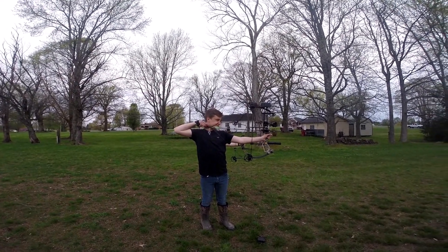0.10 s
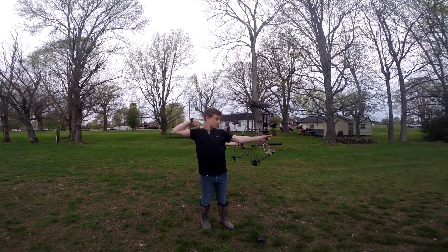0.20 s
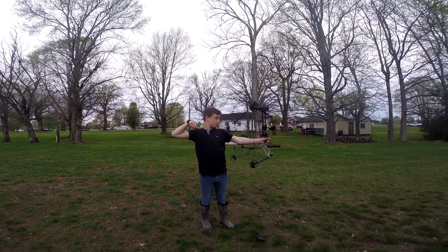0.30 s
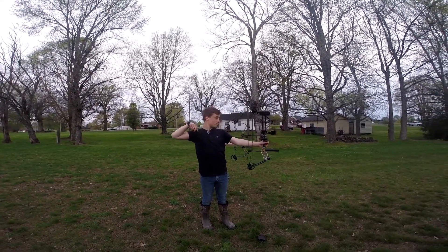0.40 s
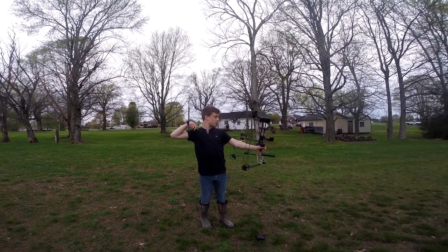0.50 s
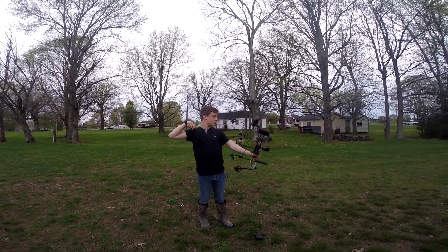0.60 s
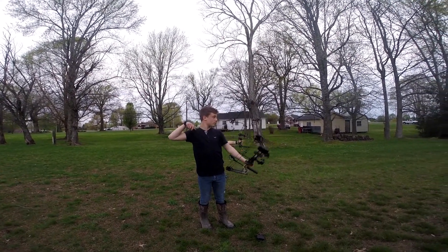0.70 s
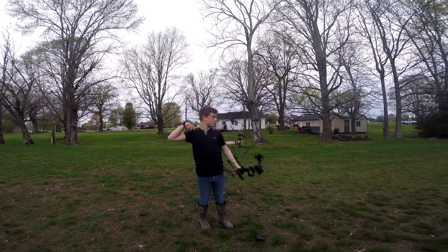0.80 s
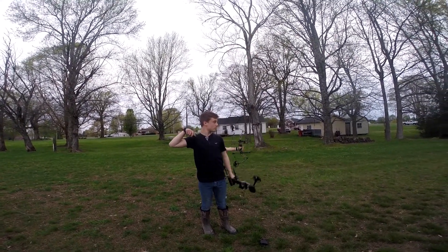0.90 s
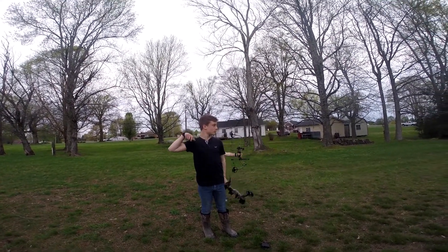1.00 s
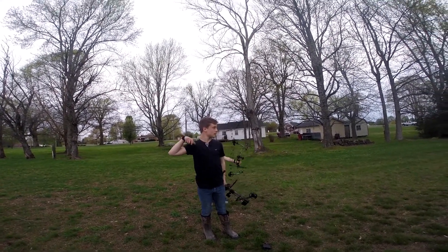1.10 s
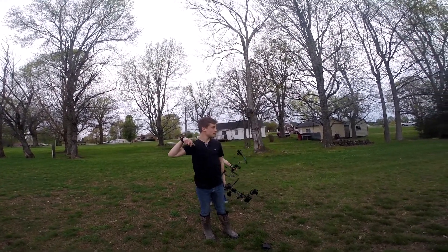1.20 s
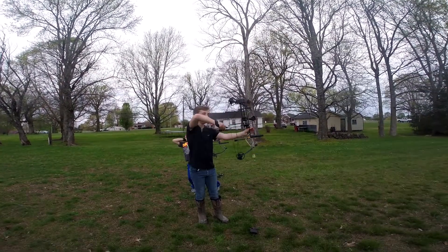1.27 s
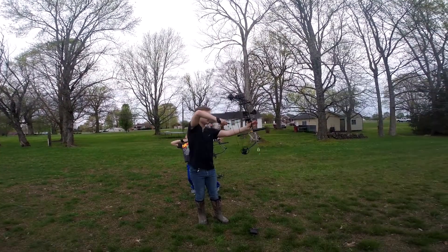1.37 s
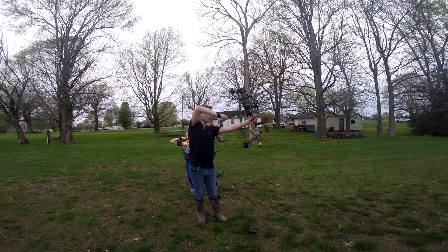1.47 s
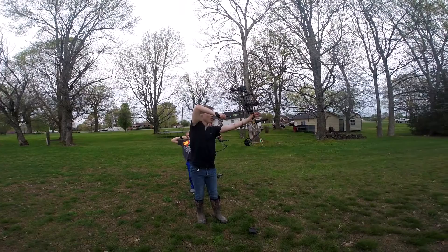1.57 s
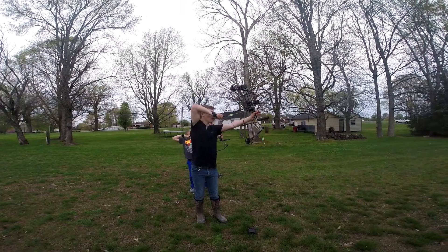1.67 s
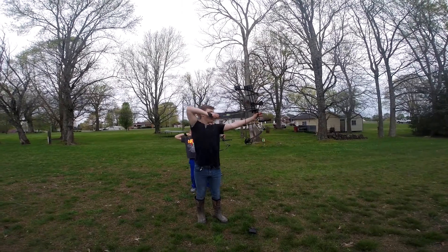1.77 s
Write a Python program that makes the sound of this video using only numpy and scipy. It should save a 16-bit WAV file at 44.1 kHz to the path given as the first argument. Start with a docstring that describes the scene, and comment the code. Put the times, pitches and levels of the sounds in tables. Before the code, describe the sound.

Two compound bows shoot one after the other on an open lawn, strings twanging and fittings rattling. Each arrow knocks into a target a moment later, echoing lightly off trees, over low distant traffic and light wind on the microphone.

```python
"""A thin tick and a ringing, buzzing slam: a compound bow fires on an open lawn, then a second one.
The string slams home and twangs, limbs and riser ring, loose fittings buzz and clack. About a third
of a second after each shot the arrow smacks into a nearby butt, and the trees scatter the smack back.
Faint rustles and a far bird sit over distant traffic, air, a low drone and a faint electronic whine.
Wind puffs softly on the microphone. All sound drops out briefly after the second arrow."""
import sys
import numpy as np
from scipy import signal
from scipy.fft import rfft, irfft
from scipy.io import wavfile

SR = 44100
rng = np.random.default_rng(int(sys.argv[2]) if len(sys.argv) > 2 else 0)


def wav_record(signal):
    """Record a signal, one row per channel, as 16-bit PCM in the file named by sys.argv[1]."""
    frames = np.transpose(np.atleast_2d(signal))
    bounded = np.clip(frames, -1, 1)
    # unit amplitude maps onto the largest positive 16-bit level
    quanta = np.round(bounded * 32767).astype(np.int16)
    wavfile.write(sys.argv[1], SR, quanta)


N = 79380
T = np.arange(N) / SR

# brief dip of the whole mix: t/s, gain/dB
DROPOUT = [(1.221, -0.5), (1.226, -24), (1.25, -47), (1.295, -41), (1.313, -1.5)]
DROPOUT_BOTTOM_S = DROPOUT[2][0]


def from_db(db):
    """Decibels to gain."""
    return 10 ** (np.asarray(db) / 20)


def unit_rms(x):
    """Scale to unit rms."""
    return x / np.sqrt(np.mean(x ** 2) + 1e-20)


def colour(x, spectrum):
    """EQ a steady signal to a curve of f/Hz, relative level/dB; the result has unit rms."""
    hz, db = np.transpose(spectrum)
    bins = np.maximum(np.fft.rfftfreq(N, 1 / SR), 1)
    gain = from_db(np.interp(np.log(bins), np.log(hz), db))
    return unit_rms(irfft(rfft(x) * gain, N))


def burst(peak, rise, t60):
    """Envelope that swells up to its peak time and then dies away."""
    age = T - peak
    return np.exp(np.minimum(age, 0) * 2 / rise) * 1000 ** (-np.maximum(age, 0) / t60)


def ring(start, modes):
    """Decaying sines of alternating polarity, set off by one blow."""
    age = np.maximum(T - start, 0)
    return sum((-1) ** k * from_db(db) * np.sin(2 * np.pi * hz * age) * 1000 ** (-age / t60)
               for k, (hz, db, t60) in enumerate(modes))


def grains(per_s=5600, spread_db=4.5):
    """Dense tiny contacts of uneven strength."""
    contacts = (rng.random(N) < per_s / SR) * rng.choice([-1, 1], N)
    return contacts * from_db(spread_db * rng.standard_normal(N))


def push(centre, width):
    """One short rounded pressure pulse."""
    return np.exp(-.5 * ((T - centre) / width) ** 2)


def bows():
    """The string slams home, ringing each bow and setting its fittings buzzing."""
    # one slam per bow: t/s, ring gain/dB, buzz level/dB, buzz rise/s, buzz t60/s
    shots = [(.228, -20.5, -19.5, 0.0047, 0.18), (0.8552, -17.5, -25, 0.0042, 0.089)]
    # modes of the first bow's limbs, riser and fittings: f/Hz, level/dB, t60/s
    first_bow = [(279, -14.5, 0.18), (406, 2, 0.12), (539.3, -8, 0.25), (790, -10, 0.11), (904, 2, 0.04),
                 (971, -4, .13), (1036, -13.5, 0.18), (1550, -18.5, 0.42), (2370, -17, 0.13),
                 (2407, -15.5, 0.28), (2560, -17, .11), (2827, -10, 0.17), (4430, -13.5, 0.042),
                 (4840, -14.5, 0.12), (5570, -17, 0.11), (5560, -9.5, .095), (5870, -7, 0.11),
                 (6130, -17.5, 0.11)]
    # modes of the second bow's limbs and riser: f/Hz, level/dB, t60/s
    second_bow = [(424, -1.5, 0.039), (620, -2.5, 0.019), (800, -12, 0.034), (1002, -5.5, 0.049),
                  (1108, -5, 0.038), (1985, -16.5, .04), (2325, -20.5, 0.071), (3140, -20.5, 0.073)]
    # buzz of the fittings: f/Hz, level/dB
    buzz_eq = [(120, -14), (280, -1.5), (430, -1.5), (630, -5), (980, 6), (1350, -6.5), (2800, -5),
               (3900, -14), (4800, -9.5), (5900, -11.5), (7000, -19), (8300, -17.5), (10000, -31),
               (15000, -33.5)]
    buzz = colour(grains(), buzz_eq)
    return sum(from_db(db) * ring(t, modes) + from_db(buzz_db) * buzz * burst(t, rise, t60)
               for (t, db, buzz_db, rise, t60), modes in zip(shots, (first_bow, second_bow)))


def arrows(crack_t60_s=0.012, echo_cut_hz=1200):
    """Each arrow cracks into the butt, which springs back; face and shaft ring, the trees answer."""
    # strikes: t/s, gain/dB, contact width/s, rebound delay/s, rebound ratio,
    # face/dB, shaft/dB, crack/dB (these three relative to the strike), scatter/dB
    hits = [(0.5033, -5.5, .00013, 0.000752, 1.23, -9.5, -27.5, -20, -38.5),
            (1.1946, -9.5, 0.00019, 0.000646, 1.14, -1, -9, -25.5, -53)]
    # thud of the butt's face: f/Hz, level/dB, t60/s
    face_modes = [(72, -19.5, 0.22), (463, -11, 0.043), (760, -32, 0.013), (1043, -13, 0.025)]
    # ping of the shaft: f/Hz, level/dB, t60/s
    shaft_modes = [(3446, -1, 0.0086), (3730, 1.5, 0.004), (7390, -11.5, 0.0082), (8550, -14.5, 0.0078)]
    # crack of the impact: f/Hz, level/dB
    crack_eq = [(500, 1.5), (2000, -2.5), (3500, 7), (4600, -9.5), (6500, -1), (9000, -26.5), (14000, -28)]
    # dull slaps off the ground and nearby things: delay/s, gain/dB
    echoes = [(.0072, -15.5), (0.034, -21.5)]
    # tails scattered by the trees: delay/s, gain/dB, rise/s, t60/s
    tails = [(.02, 1, 0.025, 0.76), (.032, 4, 0.0017, 0.057), (.145, -2.5, .002, .12)]
    # tone of those tails: f/Hz, level/dB
    scatter_eq = [(120, 1.5), (300, 11.5), (600, 2.5), (1150, 10), (1800, -7), (3300, -11.5), (5000, -20),
                  (8000, -28), (14000, -49)]
    scatter = colour(rng.standard_normal(N), scatter_eq)
    crack_noise = colour(rng.standard_normal(N), crack_eq)
    lowpass = signal.butter(1, echo_cut_hz, fs=SR, output="sos")
    out = 0
    for t, db, contact, delay, rebound, face_db, shaft_db, crack_db, scatter_db in hits:
        dent = push(t, contact) - rebound * push(t + delay, contact)
        face = from_db(face_db) * ring(t + delay, face_modes)
        shaft = from_db(shaft_db) * ring(t + contact, shaft_modes)
        crack = from_db(crack_db) * crack_noise * burst(t + delay, delay, crack_t60_s)
        smack = from_db(db) * (dent + face + shaft + crack)
        dulled = signal.sosfilt(lowpass, smack + 1e-18)
        slaps = sum(from_db(echo_db) * np.interp(T - lag, T, dulled) for lag, echo_db in echoes)
        trees = sum(from_db(scatter_db + tail_db) * burst(t + lag, rise, t60)
                    for lag, tail_db, rise, t60 in tails)
        out += smack + slaps + scatter * trees * (T > t) * (T < DROPOUT_BOTTOM_S)
    return out


def fittings():
    """Bright clacks of loose metal parts shaken by the shot."""
    # clacks: t/s, level/dB, t60/s
    clacks = [(0.2285, -21, 0.028), (0.2381, -22.5, 0.026), (0.2525, -21.5, 0.017), (0.269, -36.5, .02),
              (0.2752, -32, 0.021), (0.8558, -21.5, 0.022), (0.8669, -31, 0.014)]
    # metallic tone: f/Hz, level/dB
    clack_eq = [(500, -23), (1500, -11), (3000, 0), (4000, 1.5), (5800, 4.5), (7000, -7.5), (8400, -5),
                (10500, -13.5), (15000, -40.5)]
    metal = colour(grains(), clack_eq)
    return metal * sum(from_db(db) * burst(t, 0.00087, t60) for t, db, t60 in clacks)


def strings(settle_s=0.02):
    """Each string twangs on, its pitch rising as the limbs come to rest."""
    # twangs: t/s, level/dB, first f/Hz, settled f/Hz, t60/s
    twangs = [(0.2426, -23.5, 438, 481.6, .22), (.866, -25, 448, 449, 0.1)]
    out = 0
    for t, db, first_hz, settled_hz, t60 in twangs:
        age = np.maximum(T - t, 0)
        hz = settled_hz + (first_hz - settled_hz) * np.exp(-age / settle_s)
        phase = 2 * np.pi * np.cumsum(hz * (T > t)) / SR
        out += from_db(db) * np.sin(phase) * 1000 ** (-age / t60)
    return out


def release():
    """The release opens with a thin double tick just ahead of the first shot."""
    # ticks: t/s, level/dB
    ticks = [(0.2127, -30.5), (.217, -37)]
    # thin, bright tone: f/Hz, level/dB
    tick_eq = [(2000, -14.5), (6300, -8), (7500, 11), (9000, -15.5), (12500, -24), (15000, -7)]
    noise = colour(rng.standard_normal(N), tick_eq)
    return noise * sum(from_db(db) * burst(t, rise=.001, t60=0.0053) for t, db in ticks)


def far_echo_and_rustles():
    """A faint, bright far echo of the first arrow's smack, then two soft rustles."""
    # the echo, then the rustles: t/s, level/dB, rise/s, t60/s
    events = [(0.647, -50, .001, 0.017), (1.324, -51.5, 0.036, 0.074), (1.722, -49.5, 0.003, 0.027)]
    # their bright tone: f/Hz, level/dB
    bright_eq = [(800, -11), (2400, 0.5), (3500, 8.5), (5000, 4), (6200, -9), (7500, -5.5), (10000, -19),
                 (15000, -33)]
    texture = colour(grains(), bright_eq)
    return texture * sum(from_db(db) * burst(t, rise, t60) for t, db, rise, t60 in events)


def bird(pitch_sag=0.085, blur_hz=90):
    """A far bird's thin whistles arch up and down in pitch, blurred by the trees."""
    # whistles: crest t/s, crest f/Hz, half length/s, level/dB
    whistles = [(1.152, 8900, 0.036, -70), (1.595, 7270, .13, -70), (1.622, 5140, .11, -65)]
    lowpass = signal.butter(2, blur_hz, fs=SR, output="sos")
    out = 0
    for t, hz, half, db in whistles:
        off_crest = np.minimum(((T - t) / half) ** 2, 1)
        blur = unit_rms(signal.sosfilt(lowpass, rng.standard_normal(N)))
        phase = 2 * np.pi * np.cumsum(hz * (1 - pitch_sag * off_crest)) / SR
        out += from_db(db) * blur * (1 - off_crest) * np.sin(phase)
    return out


def traffic_and_wind(drone_hz=114.2, drone_width_hz=7.8, drone_db=-54.5):
    """A bed of far traffic and air; soft low puffs of wind on the microphone over a steady drone."""
    # bed before the dropout: f/Hz, level/dB
    early_eq = [(15, -42), (25, -12.5), (110, -0.5), (457, -21.5), (631, -16), (826, -16), (895, -14),
                (1050, -12.5), (1140, -15), (1300, -14.5), (1950, -22.5), (2630, -31.5), (3170, -28),
                (3830, -35), (5880, -35.5), (10600, -51), (13200, -49.5), (14300, -46.5), (15500, -53.5)]
    # bed after the dropout: f/Hz, level/dB
    late_eq = [(15, -36), (25, -13), (96, 0), (144, -9.5), (173, -7.5), (389, -19.5), (826, -7.5),
               (1170, -10.5), (1710, -23), (3000, -31), (4040, -34.5), (5010, -34), (6210, -40.5),
               (7500, -42), (8810, -48), (14300, -52), (15500, -47)]
    # level ride of the bed: t/s, level/dB
    ride = [(0, -43.5), (.7, -44), (1.2, -42.5), (1.33, -50), (1.45, -46), (1.62, -42.5), (1.8, -43.5)]
    # wind puffs: t/s, level/dB, rise/s, t60/s
    puffs = [(.135, -41.5, 0.043, 0.17), (0.438, -40.5, 0.06, 0.15), (1.769, -41, 0.025, 0.13)]
    early = colour(rng.standard_normal(N), early_eq)
    late = colour(rng.standard_normal(N), late_eq)
    bed = from_db(np.interp(T, *np.transpose(ride))) * np.where(T < DROPOUT_BOTTOM_S, early, late)
    resonance = signal.iirpeak(drone_hz, drone_hz / drone_width_hz, fs=SR)
    rumble = signal.lfilter(*resonance, rng.standard_normal(N))
    rumble = signal.sosfilt(signal.butter(2, 2 * drone_hz, fs=SR, output="sos"), rumble)
    wind = sum(from_db(db) * burst(t, rise, t60) for t, db, rise, t60 in puffs)
    return bed + (from_db(drone_db) + wind) * unit_rms(rumble)


def scene():
    """Both shots and the lawn around them, in mono."""
    archery = release() + bows() + strings() + fittings() + arrows()
    return (archery + far_echo_and_rustles() + bird() + traffic_and_wind())[None]


def record(dry):
    """A faint whine joins, the mix drops out briefly, and a steep low-pass trims the top."""
    # whine of the electronics: f/Hz, rms level/dB
    whine_tones = [(11700, -79.5), (14626, -82.5)]
    cutoff_hz = 15600
    whine = sum(from_db(db) * np.sqrt(2) * np.sin(2 * np.pi * hz * T) for hz, db in whine_tones)
    dipped = (dry + whine) * from_db(np.interp(T, *np.transpose(DROPOUT)))
    return signal.sosfilt(signal.ellip(10, .1, 80, cutoff_hz, fs=SR, output="sos"), dipped)


dry = scene()
out = record(dry)
wav_record(out)
```